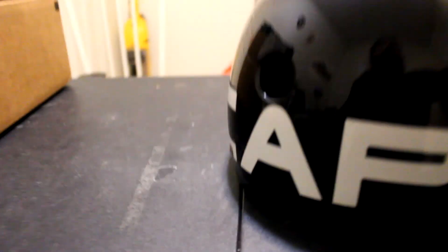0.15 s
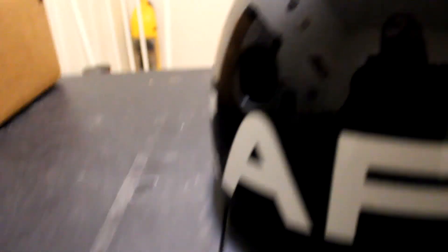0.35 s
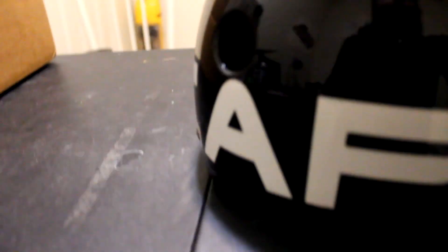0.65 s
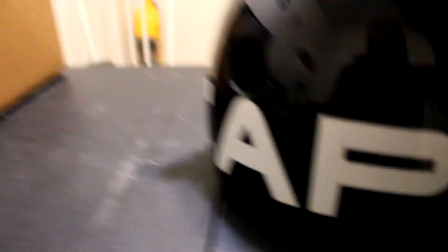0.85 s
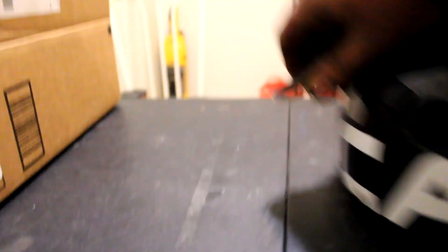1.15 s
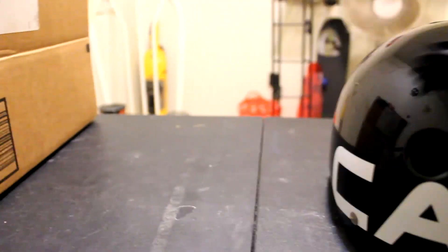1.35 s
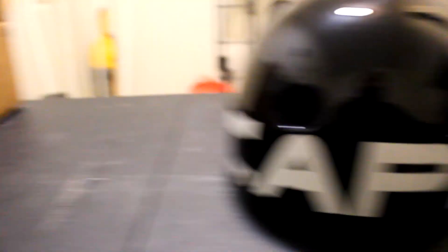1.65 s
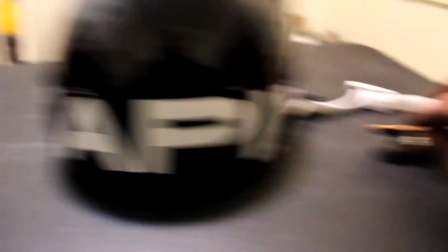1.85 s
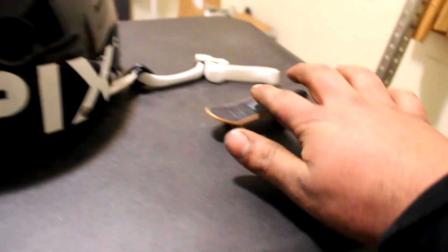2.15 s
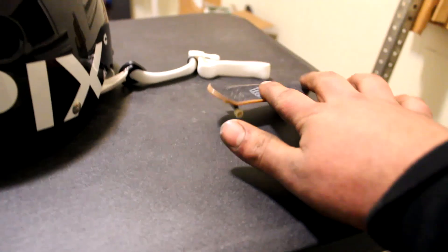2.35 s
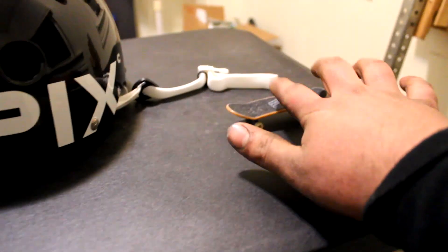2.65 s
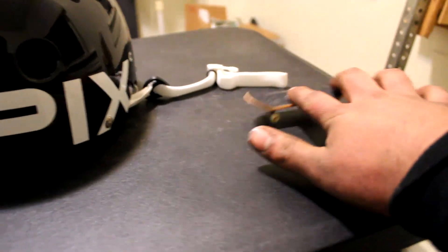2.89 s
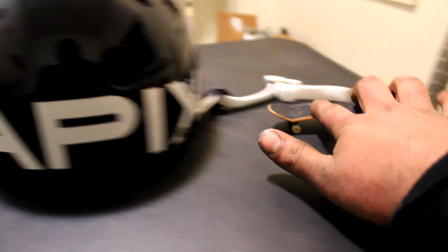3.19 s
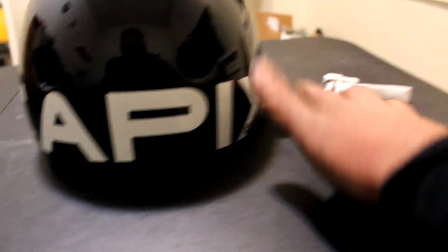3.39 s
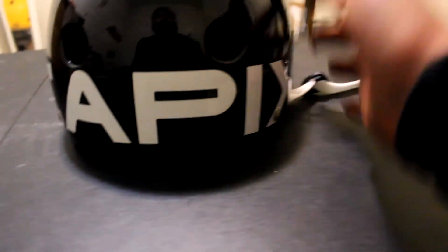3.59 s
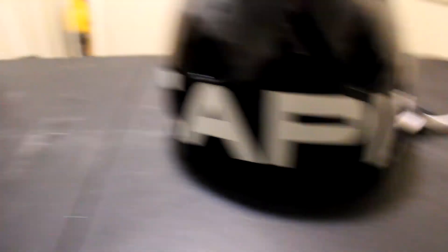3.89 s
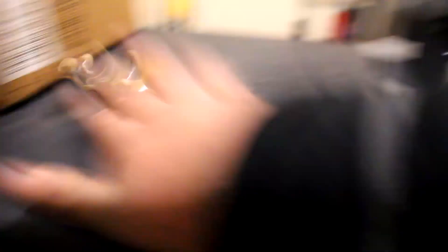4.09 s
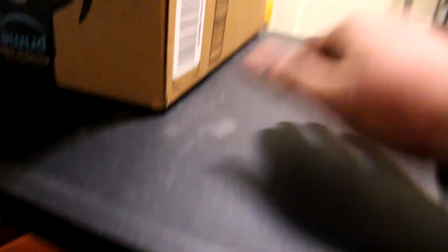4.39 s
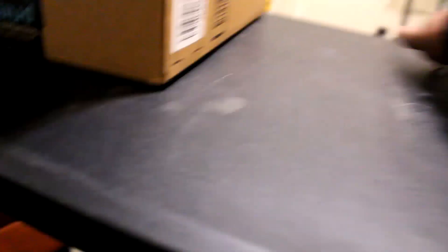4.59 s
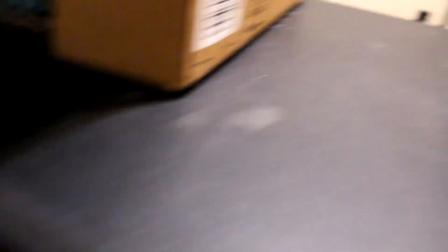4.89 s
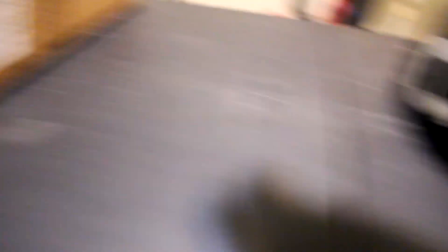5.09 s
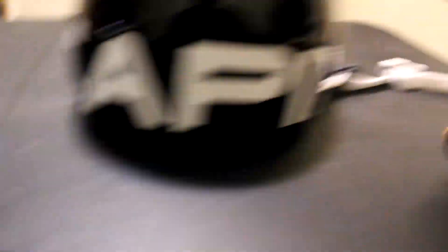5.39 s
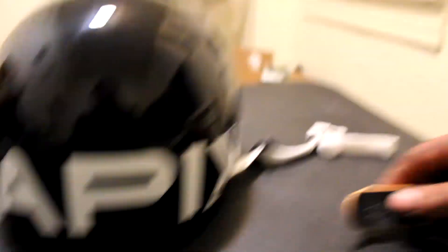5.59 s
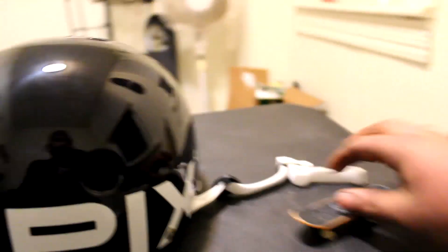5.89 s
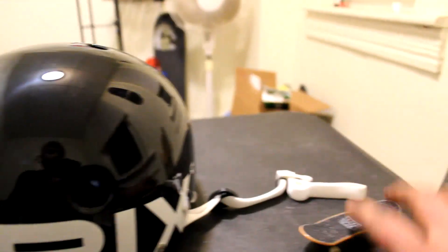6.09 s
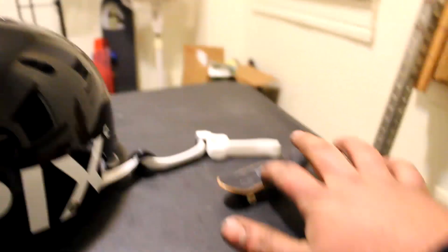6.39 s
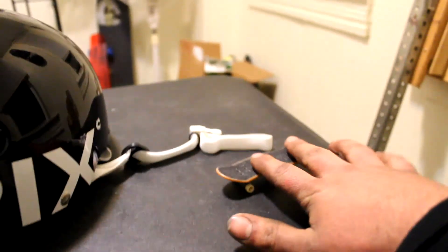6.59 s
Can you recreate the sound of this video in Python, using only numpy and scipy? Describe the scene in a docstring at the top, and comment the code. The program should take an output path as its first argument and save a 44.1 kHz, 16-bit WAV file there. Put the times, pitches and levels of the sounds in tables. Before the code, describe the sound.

Small hard wheels roll in short bursts over a hollow tabletop, between sharp wooden-metallic clacks and dull landings, heard very close by.

```python
"""A thud and a clack, then small wheels rumbling: a toy skateboard is rolled, popped and dropped on a
hollow plastic table in a small room, close to a hand-held camera. Ragged pushes ring decaying sines in
axles, deck and table; random surface bumps drive the rolling drum, buzz, scrape and rattle. Behind lie
short reflections, room air and low handling rumble; the hardest hits overload the recorder."""
import sys
import numpy as np
from scipy import signal
from scipy.fft import rfft, irfft, next_fast_len
from scipy.io import wavfile
from scipy.ndimage import uniform_filter1d

SR = 44100
rng = np.random.default_rng(int(sys.argv[2]) if len(sys.argv) > 2 else 0)


def to_wav(s):
    """Save 16-bit WAV."""
    ch = np.atleast_2d(s).T  # columns
    pcm = np.round(np.clip(ch, -1, 1) * 32767)  # PCM
    wavfile.write(sys.argv[1], SR, pcm.astype(np.int16))


N = 297542

# Deck and axles strike, or skid when the contact is long:
# start_s, axle_tick_peak_db, deck_knock_peak_db, knock_pitch_hz (strongest), contact_ms
CLACKS = [(0.0044, -21, -33, 1500, 2.5), (0.184, -29, -19.5, 3000, 2.4), (0.3343, -28, -21, 2730, 1.5),
          (0.4874, -17, -18, 1940, 0.62), (0.4899, -17, -12.5, 1960, 3.6), (0.514, -13.5, -17.5, 2640, 4.7),
          (0.8922, -9, -11, 2560, 1.38), (1.078, -44, -22.5, 2700, 1.5), (1.3487, -19, -32, 2730, 2.5),
          (1.391, -9.5, -49, 2700, 1.08), (1.408, -22.5, -37, 2700, 6.6), (1.511, -15.5, -27.5, 2670, 0.52),
          (1.734, -62, -30, 2470, 3.3), (1.7968, -55, -26.5, 2470, 1.65), (1.868, -10, -11, 2205, 1.2),
          (1.899, -18, -19, 1650, 5.8), (1.998, -6.5, -36, 1560, 1.3), (2.063, -20.5, -28, 1825, 1.7),
          (2.114, -28, -45, 3200, 1.3), (2.2342, -21.5, -33, 2300, 3), (2.344, -31.5, -43, 2500, 0.57),
          (2.5204, -1.5, -16, 3280, 0.83), (2.82, -16, -29, 1550, 1.56), (3.017, -8, -13, 2990, 1.65),
          (3.0374, -18, -28.5, 1750, 3.5), (3.409, -3.5, 0.5, 2510, 1.02), (3.4356, -12, -24, 2500, 1.5),
          (3.4587, -9.5, -12.5, 1760, 2.3), (3.5172, -3, -5, 2580, 2.2), (3.6773, -6.5, -12.5, 2070, 2.47),
          (4.089, -17.5, -42, 2220, 1.9), (4.1101, 18.5, -15, 1700, 0.27), (4.133, -14, -7, 1490, 0.8),
          (4.1443, -6.5, -32, 2000, 0.9), (4.2761, -16.5, -19, 1660, 2.64), (4.376, -20.5, -18, 1400, 1.25),
          (4.519, -25, -14, 2390, 1.8), (4.7975, -23, -49, 2200, 1.7), (4.832, -18.5, -32, 2200, 0.85),
          (4.883, -12.5, -8.5, 1980, 11.3), (5.312, -9, -53.5, 2770, 0.54), (5.3398, -12, -29, 2820, 0.62),
          (5.35, -17, -53, 2800, 1.9), (5.4533, -15, -19, 1870, 0.14), (5.514, -14.5, -20, 3300, 4.2),
          (5.691, -7.5, -24, 1520, 1.95), (5.7612, 5, -7.5, 1830, 0.41), (6.1738, -17, -24, 2477, 6.6),
          (6.339, -22.5, -29, 1840, 1.35), (6.548, -18.5, -52, 2300, 2.9),
          (6.5761, -7.5, -17.5, 2550, 1.34), (6.704, -23.5, -29, 1610, 3.9)]
# Board or hand lands on the table top, or judders on it when the contact is long:
# start_s, peak_db, pitch_hz (strongest), contact_ms
THUDS = [(0.004, -4, 353, 0.64), (0.053, -17, 407, 2.4), (0.322, -17, 158, 2), (0.403, -21, 400, 4.8),
         (0.417, -6.5, 343, 5.2), (0.484, -9.5, 431, 2.2), (0.513, -3, 354, 3.1), (0.874, -31, 153, 1.2),
         (1.049, -18, 347, 2.7), (1.866, -9, 352, 2.3), (1.901, -9, 289, 3.5), (1.994, -6.5, 460, 2.2),
         (2.234, -15.5, 352, 0.86), (2.517, -15, 348, 2.12), (2.808, -15, 426, 1.46),
         (3.017, -12, 210, 2.2), (3.27, -12.5, 443, 11), (4.107, 12, 371, 1.24), (4.117, 5.5, 675, 2),
         (4.144, -11, 266, 3.7), (4.275, -16.5, 880, 2.4), (4.399, -9.5, 426, 1.25), (4.518, -17.5, 388, 4),
         (4.56, -28.5, 342.7, 20), (4.795, -34, 366, 14), (4.89, -20, 416, 3.4), (5.452, -13.5, 230, 2.2),
         (5.526, -10.5, 383, 4.05), (5.692, 1, 295, 0.72), (5.758, -8, 290, 2.7), (6.172, -10.5, 324, 2.16),
         (6.544, -17, 433, 3.4)]
# Resonances of metal axles, wooden deck and hollow table: pitch_hz, level_db (relative), t60_s
AXLE_MODES = [(4845, 1.5, 0.0073), (6200, -0.5, 0.0065), (7840, -7.5, 0.0007)]
DECK_MODES = [(1570, -6, 0.027), (1945, 21, 0.0032), (2860, 19, 0.0024)]
TABLE_MODES = [(207, 1.5, 0.035), (253, 10, 0.022), (349.5, 4.5, 0.053), (413.5, 5, 0.058),
               (463.7, 8, 0.062), (541.6, 9, 0.078), (620.4, 9, 0.11), (686, 4, 0.11), (793, 20.5, 0.016),
               (901, -1.5, 0.12), (1099, -0.5, 0.18)]
# Stretches of rolling and sliding: start_s, end_s, change_db (start to end), then at mid-stretch
# low_drum_db, upper_drum_db, deck_buzz_db, scrape_db (wheels and skin)
ROLLS = [(0.01, 0.21, -22, -31, -42, -51, -56.5), (0.358, 0.55, -3, -30.5, -31.5, -47.5, -46.5),
         (1.07, 1.284, 2.5, -22.5, -25.5, -26, -37.5), (1.382, 1.66, 15, -58, -74, -64, -55.5),
         (1.886, 2.106, 1.5, -32.5, -33, -45.5, -41.5), (2.313, 2.45, -0.5, -41, -43, -71, -77),
         (2.513, 2.526, -4.5, -33, -39, -48, -62), (2.81, 3.007, 7.5, -41.5, -49, -62, -62),
         (3.03, 3.204, 10.5, -33, -38.5, -42.5, -41.5), (3.134, 3.432, 4.5, -62, -18.5, -29.5, -40.5),
         (3.372, 3.559, -3.5, -36, -38.5, -29, -33.5), (3.662, 3.675, -10, -41, -59, -37, -39),
         (4.18, 4.334, 29, -42, -62, -61, -69), (4.388, 4.607, -4, -33, -29, -35.5, -35.5),
         (4.58, 4.93, 4, -66, -39.5, -42.5, -45.5), (5.323, 5.406, -5.5, -59, -59, -53, -41.5),
         (5.538, 5.588, -14.5, -32, -34.5, -42, -36), (5.597, 5.742, -0.5, -39, -30.5, -33, -33.5),
         (5.885, 6.07, -15, -40, -41, -47, -52.5), (6.18, 6.288, 12, -37.5, -50.5, -49.5, -54.5),
         (6.341, 6.405, -8.5, -38.5, -39, -51, -51), (6.564, 6.656, -15.5, -33.5, -40, -54, -54),
         (6.674, 6.8, 3, -46, -24.5, -40, -41.5)]
# Swell at mid-stretch, one per layer in the order above: arch_db_per_s of stretch length
ROLL_ARCH = [24.8, 25, 35, 39.7]
# Bright layers follow a change of speed more than the low ones, one per layer: factor on change_db
ROLL_FOLLOWS = [0.43, 1.57, 1.4, 1.97]
# Background level between the stretches, with a brief dip after early hits: time_s, level_db
BACKGROUND = [(0, -59), (0.6, -45.5), (0.72, -74.5), (0.86, -60), (1.0, -50.5), (1.8, -51), (2.7, -55.5),
              (4, -52.5), (6.75, -53.5)]
# Share of the background in each of the four layers: level_db
BACKGROUND_SHARES = [-1, -8, -5.5, -4.5]
# Tone of room air and recorder hiss: freq_hz, level_db (relative)
HUSH_TONE = [(59, -26.5), (100, 4), (202, -42.5), (2730, -3.5), (7850, -16), (14000, -32)]
# The hand shifts on the camera body: time_s, level_db
GRIP_LEVELS = [(0, -64), (1.05, -60), (1.22, -38), (1.55, -40), (1.85, -57), (6.75, -60)]
# Microphone tone: freq_hz, level_db
MIC_TONE = [(7500, 2.5), (10000, -11), (15000, -9.5)]

ROLL_RISE_DB_S, ROLL_FALL_DB_S = 497, 251  # wheels speed up and run out
ROOM_T60_S, ROOM_DB, ROOM_DAMP_HZ = 0.14, -9.5, 6640
HUSH_DB = -66
MIC_LOW_HZ, TOP_HZ = 136.5, 15800  # bass cut of the microphone, top cut of the recorder


def undb(db):
    """dB to gain."""
    return 10 ** (np.asarray(db) / 20)


def unit(x):
    """Scale to rms 1."""
    return x / np.sqrt(np.mean(x ** 2))


def band(x, lo_hz, hi_hz):
    """Band-pass."""
    return signal.sosfilt(signal.butter(2, [lo_hz, hi_hz], "band", fs=SR, output="sos"), x)


def colour(x, points):
    """Shape the tone by (freq_hz, level_db) points, joined along log frequency."""
    hz, db = np.transpose(points)
    size = next_fast_len(len(x))
    log_hz = np.log(np.arange(1, size // 2 + 2) * SR / size)
    gain = undb(np.interp(log_hz, np.log(hz), db))
    return irfft(rfft(x, size) * gain, size)[:len(x)]


def walk(rate):
    """Wandering control signal: random levels held 1 / rate s and slewed, rms 1."""
    hold = int(SR / rate)
    steps = np.repeat(rng.standard_normal(N // hold + 1), hold)
    return unit(uniform_filter1d(steps, hold)[:N])


def board():
    """Every strike ticks in the metal axles and knocks in the wooden deck."""
    axle_hz = 6500  # where the ticks focus
    tick_events = [(s, tick_db, axle_hz, ms) for s, tick_db, _, _, ms in CLACKS]
    knock_events = [(s, knock_db, hz, ms) for s, _, knock_db, hz, ms in CLACKS]
    ticks = blows(tick_events, AXLE_MODES, focus_oct=3.7, crack_db=20.5, wide=1.42, bounce_db=-16)
    knocks = blows(knock_events, DECK_MODES, focus_oct=1.0, crack_db=-1.5, wide=1.596)
    return ticks + knocks


def landings():
    """Board or hand thuds on the table top, whose ring is shortened by a resting hand."""
    return blows(THUDS, TABLE_MODES, focus_oct=0.65, crack_db=-3.5, wide=2.62,
                 chatter=0.073, held=0.42, bounce_db=-12.0)


def blows(events, modes, focus_oct, crack_db, wide, chatter=0, held=1, bounce_db=-11, bounce_s=0.0302):
    """Each blow is a short ragged push with three weaker bounces; its pitch decides which modes speak."""
    out = np.zeros(N + SR)
    mode_hz = np.array(modes)[:, :1]
    t = np.arange(SR // 10) / SR
    for start_s, peak_db, pitch_hz, contact_ms in events:
        level_chance, tune_chance = rng.standard_normal((2, len(mode_hz), 1))
        rag = rng.standard_normal(len(t))
        # the contact springs back and forth at the strongest pitch, more evenly the longer it lasts
        rag = rag + chatter * contact_ms * np.sin(2 * np.pi * pitch_hz * t)

        late = np.array([0, 1, 1, 1])[:, None] * rng.random((4, 1))  # the blow, then its bounces
        age = np.maximum(t - bounce_s * late, 0) / (max(contact_ms, .2) / 1000)
        strength = undb(bounce_db * (np.sign(late) + late))  # later bounces are weaker
        push = rag * np.sum(strength * age * np.exp(-age), axis=0)

        focus = np.exp(-(np.log2(mode_hz / pitch_hz) / focus_oct) ** 2)
        gains = focus * undb(2 * level_chance)
        body = signal.fftconvolve(push, ring(modes, gains, 1 + 0.017 * tune_chance, held))
        body /= np.abs(body).max()

        # direct contact noise around the pitch, on top of the ringing body
        crack = band(push, pitch_hz / wide, min(pitch_hz * wide, 18000))
        body[:len(crack)] += undb(crack_db) * crack / np.abs(crack).max()
        at = int(start_s * SR)
        out[at:at + len(body)] += undb(peak_db) * body / np.abs(body).max()
    return out[:N]


def ring(modes, gains, detune=1, held=1):
    """Response of an object to one tap: decaying sines; a hand resting on it shortens the ring."""
    hz, db, t60 = np.array(modes).T[:, :, None]
    t = np.arange(SR // 5) / SR
    tones = np.sin(2 * np.pi * hz * detune * t)
    decay = 1000. ** (-t / (held * t60))
    return np.sum(gains * undb(db) * tones * decay, axis=0)


def rolling():
    """Small hard wheels stumble over the surface: the table drums, the deck buzzes, the contact hisses."""
    low_db, upper_db, deck_db, scrape_db = roll_levels()
    bumps, judder = grit(per_s=6000, spread_db=0.3), walk(50)

    # as the wheels travel over the top, each mode of the table swells and fades on its own
    drum = []
    for mode in TABLE_MODES:
        tone = signal.fftconvolve(bumps, ring([mode], 1))[:N]
        drum.append(tone * undb(2.8 * walk(18)))
    low, upper = unit(sum(drum[:4])), unit(sum(drum[4:]))
    deck = unit(band(bumps, 1310, 2520))

    # the contact patch keeps changing, so the hiss around each axle resonance flares on its own
    grains = grit(per_s=6500, spread_db=2.0)
    scrape = unit(sum(band(grains, hz / 1.2, hz * 1.15) * undb(2.2 * walk(25))
                      for hz, _, _ in AXLE_MODES))
    # loose wheels rattle on their axles now and then
    rattle = unit(sum(signal.fftconvolve(grit(per_s=30, spread_db=4.0), ring([mode], 1))[:N]
                      for mode in AXLE_MODES))

    drumming = low * undb(low_db + 0.72 * judder) + upper * undb(upper_db + 2.4 * judder)
    buzz = deck * undb(deck_db + 0.8 * judder)
    hiss = (scrape + undb(-7.5) * rattle) * undb(scrape_db + 1.73 * walk(71))
    return drumming + buzz + hiss


def roll_levels():
    """Level in dB of the four rolling layers: each stretch rises, drifts and falls over the background."""
    t = np.arange(N) / SR
    follows, arch, shares = (np.array(x)[:, None] for x in (ROLL_FOLLOWS, ROLL_ARCH, BACKGROUND_SHARES))
    background_db = np.interp(t, *np.transpose(BACKGROUND)) + shares
    power = undb(2 * background_db)  # doubled dB turns gain into power
    for start, end, change_db, *layers_db in ROLLS:
        near = slice(max(int((start - .3) * SR), 0), int((end + .3) * SR))
        done = np.clip((t[near] - start) / (end - start), 0, 1) - .5  # 0 at mid-stretch
        drift = change_db * follows * done
        swell = -arch * (end - start) * (2 * done) ** 2
        before, after = np.maximum(start - t[near], 0), np.maximum(t[near] - end, 0)
        edges = ROLL_RISE_DB_S * before + ROLL_FALL_DB_S * after
        power[:, near] += undb(2 * (drift + swell - edges + np.array(layers_db)[:, None]))
    return 10 * np.log10(power)


def grit(per_s, spread_db):
    """Bumps of the pebbled surface: random ticks of very uneven size."""
    hits = rng.random(N) < per_s / SR
    size = undb(spread_db * np.minimum(rng.exponential(size=N), 4))
    return hits * rng.standard_normal(N) * size


def room(x):
    """Dense decaying reflections, made of noise; the treble dies sooner."""
    t = np.arange(SR // 2) / SR
    noise = rng.standard_normal(len(t)) * np.minimum(t / 0.0039, 1)  # builds up over 3.9 ms
    low = band(noise, 77, ROOM_DAMP_HZ) * 1000. ** (-t / ROOM_T60_S)
    high = band(noise, ROOM_DAMP_HZ, 12000) * 1000. ** (-t / (0.86 * ROOM_T60_S))
    tail = low + high
    return signal.fftconvolve(x, tail / np.sqrt(np.sum(tail ** 2)))[:N] * undb(ROOM_DB)


def hush():
    """Room air and recorder hiss: steady coloured noise."""
    return unit(colour(rng.standard_normal(N), HUSH_TONE)) * undb(HUSH_DB)


def grip():
    """Low rumble conducted through the camera body: noise whose level follows the hand and wavers."""
    s, db = np.transpose(GRIP_LEVELS)
    rumble = band(band(rng.standard_normal(N), 12, 55), 12, 55)  # twice, for steeper edges
    return unit(rumble) * undb(np.interp(np.arange(N) / SR, s, db) + 4.0 * walk(8))


def scene():
    """Blows with their room, rolling and hush reach the microphone; handling joins inside the camera."""
    hits = board() + landings()
    air = colour(hits + room(hits) + rolling() + hush(), MIC_TONE)
    # the microphone port cuts airborne bass; handling reaches the capsule through the body
    air = signal.sosfilt(signal.butter(6, MIC_LOW_HZ, "high", fs=SR, output="sos"), air)
    return (air + grip())[None]


def record(dry):
    """Hard overload at full scale, then a steep top cut."""
    return signal.sosfilt(signal.ellip(8, .2, 70, TOP_HZ, fs=SR, output="sos"), np.clip(dry, -1, 1))


dry = scene()
out = record(dry)
to_wav(out)
```